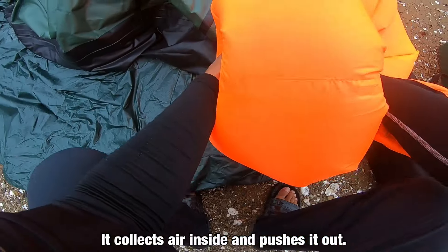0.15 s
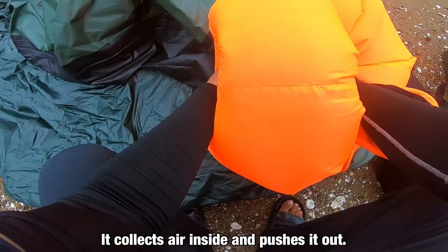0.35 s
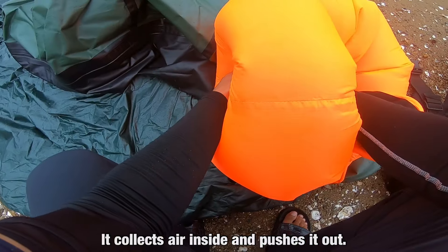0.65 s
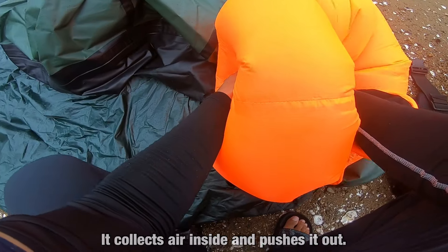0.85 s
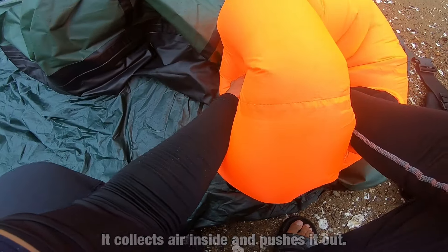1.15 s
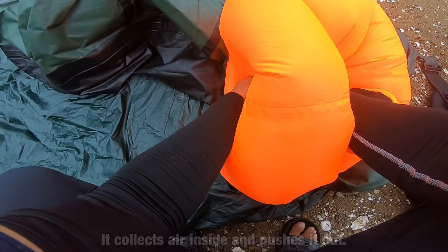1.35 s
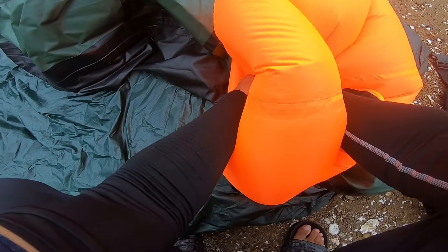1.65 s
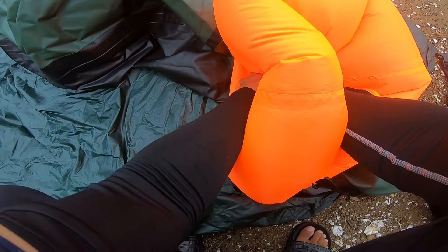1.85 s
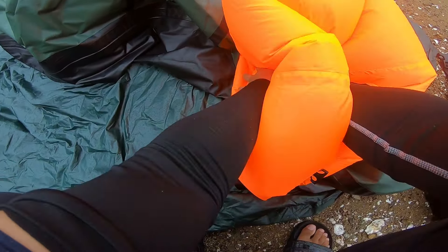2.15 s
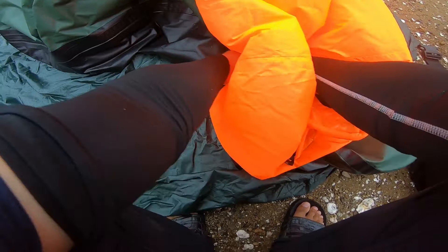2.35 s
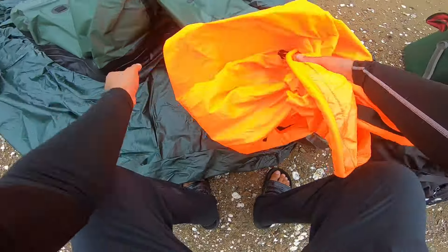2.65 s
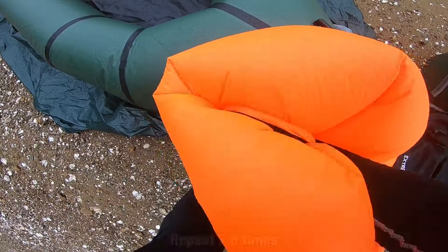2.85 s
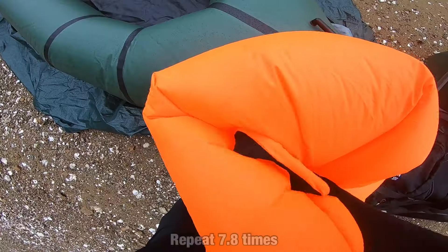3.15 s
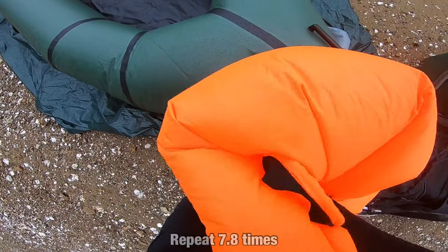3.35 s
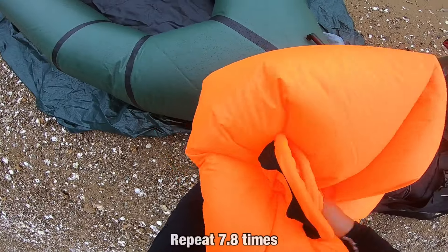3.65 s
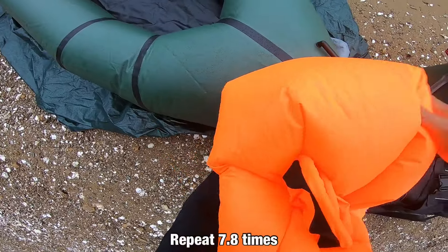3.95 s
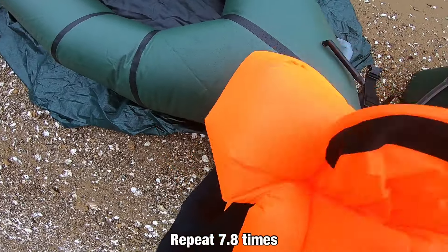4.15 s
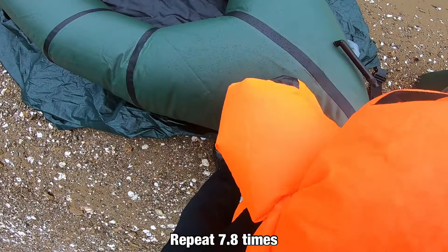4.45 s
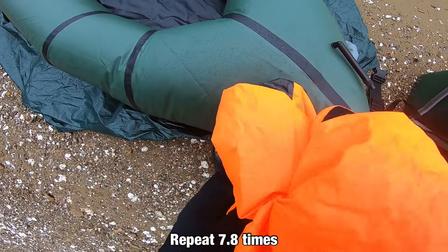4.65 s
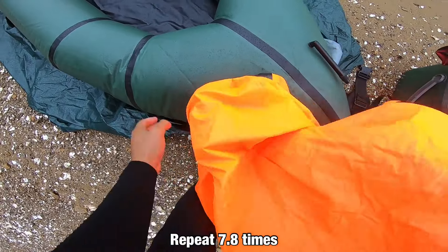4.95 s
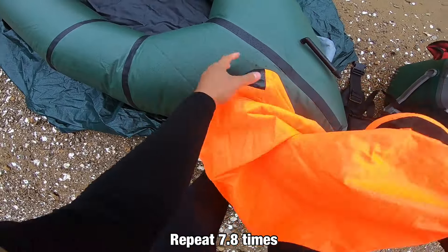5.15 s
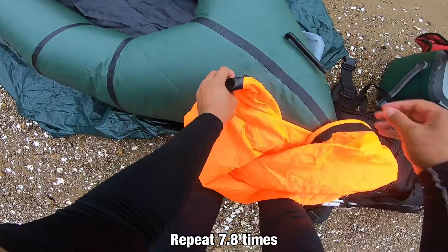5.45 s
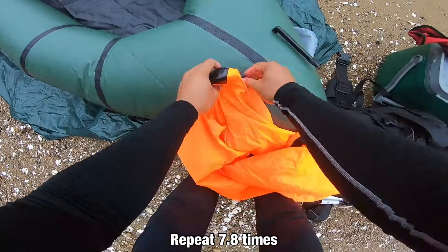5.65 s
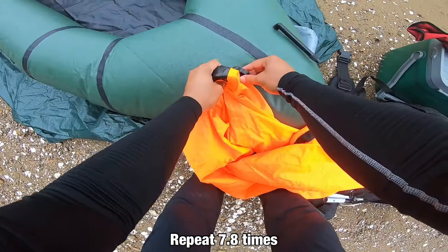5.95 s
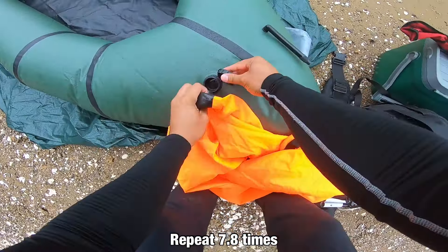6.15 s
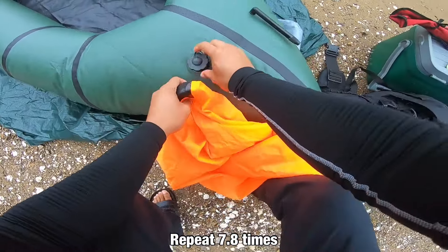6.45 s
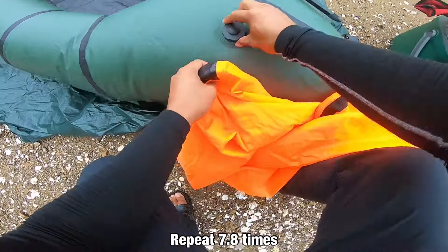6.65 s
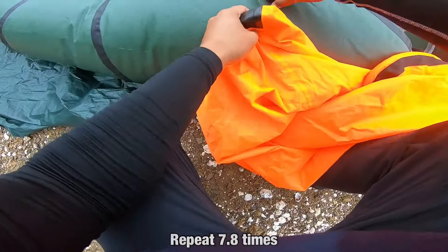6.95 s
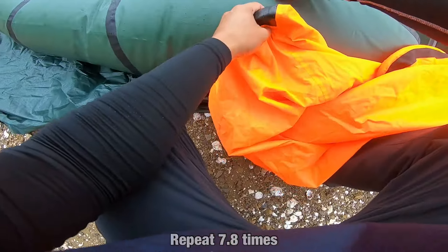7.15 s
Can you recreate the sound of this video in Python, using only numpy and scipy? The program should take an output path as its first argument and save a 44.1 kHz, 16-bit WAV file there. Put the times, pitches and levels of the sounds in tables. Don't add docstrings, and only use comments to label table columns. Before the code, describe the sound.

Thin fabric, puffed up with air, is pressed by hand right beside a small stereo camera outdoors. Dry rustle, irregular low pops with dropping pitch and dull taps against an inflated boat come thickly, then the scene cuts abruptly to separate shakes and folds and a short rubbery creak. The fabric slackens and quietens to light crinkles and small plastic ticks; low wind gusts thud and roar over it. A barely audible thin whistle of air ends it.

```python
import sys
import numpy as np
from scipy import signal
from scipy.fft import rfft, irfft, next_fast_len
from scipy.io import wavfile
from scipy.ndimage import uniform_filter1d, minimum_filter1d

SR = 44100
rng = np.random.default_rng(int(sys.argv[2]) if len(sys.argv) > 2 else 0)


def materialize(psi):
    bounded = np.clip(np.atleast_2d(psi).T, -1, 1)
    quanta = np.round(bounded * 32767).astype(np.int16)
    wavfile.write(sys.argv[1], SR, quanta)


def gain_from_decibels(decibels):
    exponent = np.asarray(decibels, float) / 20
    return 10 ** exponent


N = 322371
T = np.arange(N) / SR
SIZE = next_fast_len(N, True)
HZ = np.fft.rfftfreq(SIZE, 1 / SR)
SCENE_CHANGE_S = 2.8102


def evened(x):
    return x / np.sqrt(np.mean(x ** 2) + 1e-20)


def read(points, hz=HZ):
    f, value = np.transpose(points)
    return np.interp(np.log(hz + 1), np.log(f + 1), value)


def columns(table):
    s, *cols = np.transpose(table)
    return [np.interp(T, s, c) for c in cols]


def colour(x, points):
    return irfft(rfft(x, SIZE) * gain_from_decibels(read(points)), SIZE)[..., :N]


def add(mix, s, sound):
    part = mix[..., round(s * SR):][..., :sound.shape[-1]]
    part += sound[..., :part.shape[-1]]


def follow(x, shape):
    return signal.oaconvolve(x, shape)[:N]


def clicks(per_s, spread_db):
    size = gain_from_decibels(spread_db * np.minimum(rng.exponential(1, N), 4.5))
    return size * (rng.random(N) < per_s / SR)


def lumps(hz):
    spectrum = rfft(rng.standard_normal(N), SIZE) / np.sqrt(1 + (HZ / hz) ** 4)
    return evened(irfft(spectrum, SIZE)[:N])


def burst(t60, rise):
    t = np.arange(round(0.14 * SR)) / SR
    return gain_from_decibels(-60 * np.maximum(t - rise, 0) / t60) * np.minimum(t / rise, 1) ** 2


def swells(rows, rise, fall):
    power = []
    for s, hold, db, _ in rows:
        level = db - rise * np.maximum(s - T, 0) - fall * np.maximum(T - s - hold, 0)
        same_scene = (T < SCENE_CHANGE_S) == (s < SCENE_CHANGE_S)
        power.append(gain_from_decibels(level) ** 2 * same_scene)
    return np.array([sum(power), sum(p * row[-1] for p, row in zip(power, rows))])


def blend(parts, rest_db, rest):
    floor = gain_from_decibels(rest_db) ** 2
    return 10 * np.log10(parts[0] + floor), (parts[1] + rest * floor) / (parts[0] + floor)


# time_s, effort_db, sizzle_over_rustle_db (hands sliding)
PRESS = [(0, -38, -16.5), (.45, -34.5, -14.5), (.9, -35, -14.5), (1.42, -35.5, -12), (1.95, -37.5, -10.5),
         (2.2, -41, -8), (2.3, -37.5, -5), (2.42, -34, -7.5), (2.56, -37.5, -5), (2.81, -42, -1)]
# start_s, hold_s, effort_db, sizzle_over_rustle_db
SHAKES = [(2.855, 0.023, -50.5, -1.5), (2.94, 0.096, -44, -8), (3.01, 0.017, -41.5, -13),
          (3.09, 0.048, -32, -7), (3.16, 0.11, -36, -8.5), (3.29, 0.057, -40, -12),
          (3.35, 0.12, -37.5, -10.5), (3.48, 0.16, -37, -8.5), (3.63, 0.14, -37.5, -3),
          (3.82, 0.088, -46.5, -3.5), (3.97, 0.24, -36.5, -5.5), (4.06, 0.06, -38.5, -1),
          (4.29, 0.069, -35, -7), (4.7, 0.17, -56.5, -3), (4.92, 0.085, -50, -4), (5.16, 0.059, -53, 0),
          (5.83, .13, -50, -2.5), (6.0, 0.12, -51, -1.5), (6.16, 0.08, -49.5, -3), (6.27, 0.065, -57.5, -5),
          (6.62, 0.025, -57.5, -16), (6.69, 0.035, -53.5, -15), (6.82, 0.031, -57, -10),
          (7.125, 0.082, -53.5, -8.5), (7.275, 0.014, -51, -8)]
# start_s, hold_s, effort_db, sizzle_over_rustle_db
DRAGS = [(4.26, 1.49, -52, -2.5), (6.3, 0.17, -57, -4), (6.5, .9, -58.5, -4), (4.75, 0.09, -45, -9.5),
         (5.18, 0.016, -56.5, 7), (5.37, 0.032, -43.5, -4.5), (5.66, 0.013, -49.5, 0)]


def hands():
    shakes = swells(SHAKES, rise=265, fall=450)
    drags = swells(DRAGS, rise=50, fall=108)
    later = blend(shakes + drags, rest_db=-65, rest=-54)
    return np.where(T < SCENE_CHANGE_S, columns(PRESS), later)


# time_s, fullness_0_to_1, drumming_over_rustle_db
FULLNESS = [(0, 0.93, 7.5), (.45, 0.94, 8.5), (1.0, 0.94, 4), (2.2, 0.94, 2), (2.52, 0.88, -0.5),
            (2.57, 0.8, -4), (2.81, 0.87, -11), (2.84, 0.8, 7), (3.15, 0.92, 0), (4.06, 0.9, 7),
            (4.38, 1, 0.5), (4.42, 1, -1), (5.4, 0.58, 1.5), (5.85, 0.6, -13), (6.2, 0, 8.5), (6.6, 0, -4),
            (6.8, 0.03, -8.5), (6.92, 0.03, 3), (7.1, 0.3, 4)]


def tightness():
    taut, boom_db = columns(FULLNESS)
    return np.clip(taut, 0, 1), boom_db


def pop(hz, t60, echo_s, echo):
    t = np.arange(round(.09 * SR)) / SR
    turns = np.cumsum(hz * (1 + 2.79 * np.exp(-t / 0.002294))) / SR
    once = -np.sin(2 * np.pi * turns) * gain_from_decibels(-60 * t / t60) * np.minimum(t / 0.0013, 1) ** 2
    return once + echo * np.interp(t - echo_s, t, once, left=0)


# pitch_hz, level_db
FULL_SKIN = [(18, -42), (30, -6.5), (86, -0.5), (206, 4), (377, -4.5), (732, -12), (1100, -18.5),
             (1430, -23), (2420, -120)]
# pitch_hz, level_db
SLACK_SKIN = [(40, -29), (110, -13), (190, 3), (300, -11.5), (600, -11.5), (1000, -24.5), (2400, -120)]


def drumming(small, noise, taut):
    patter = np.zeros(N)
    for hits, hz in zip(small, np.geomspace(180, 760, 8)):
        shape = pop(hz, 0.018, rng.uniform(0.00295, 0.0087), 0.3) * rng.choice([-1, 1])
        patter += follow(hits, shape)
    patter = evened(colour(patter, [(40, -12.0), (150, 7.0), (400, 4.5), (850, -4.5), (1100, -18.5),
                                    (2000, -18.5), (6000, -70)]))
    full = 0.54 * taut * evened(colour(noise, FULL_SKIN))
    slack = 1.32 * (1 - taut) * evened(colour(noise, SLACK_SKIN))
    return taut * patter + (full + slack) * gain_from_decibels(2.0 * lumps(43))


def thud():
    t = np.arange(round(.09 * SR)) / SR
    return np.sin(2 * np.pi * 62 * t) * gain_from_decibels(-60 * t / 0.2) * np.minimum(t / 0.0035, 1)


# time_s, peak_db,
# final_pitch_hz
POPS = [(0.124, -48, 336), (0.246, -4.5, 242), (0.267, -14, 145), (0.301, -8.5, 171), (0.583, -11.5, 455),
        (0.73, -8.5, 278), (0.803, -10.5, 340), (0.839, -13.5, 177), (0.912, -18, 230), (0.962, -5.5, 199),
        (1.04, -19, 203), (1.085, -16, 340), (1.119, -28, 350), (1.163, -23, 346), (1.308, -10, 358),
        (1.352, -42, 435), (1.392, -5, 199), (1.517, -15, 168), (1.613, -30, 327), (1.706, -9, 405),
        (1.869, -12, 200), (1.952, -5.5, 212), (2.088, -19.5, 284), (2.299, -15.5, 196), (2.336, -18, 350),
        (2.52, -28, 462),
        (3.015, -9.5, 231), (3.025, -9, 173), (3.379, -10, 215), (3.448, -12.5, 554), (3.499, -7, 201),
         (3.656, -15, 290), (3.859, -16.5, 397), (3.971, -13.5, 135), (4.074, -2, 119), (4.1092, 0, 165),
         (4.115, 1, 169), (4.259, -19, 280), (4.307, -31, 300), (4.347, -12, 218), (4.363, -2, 124.6),
         (4.371, -13, 115), (5.006, -28, 403), (5.283, -25, 560), (5.651, -17.5, 130.7), (6.04, -14, 125),
         (6.044, -25, 222), (6.178, -31, 126), (6.31, -16, 120), (6.508, -28, 379), (6.968, -12.5, 337),
         (6.975, -20, 214), (7.013, -22, 218), (7.019, -11.5, 262), (7.277, -7, 292), (7.29, -14, 322),
        (.002, -11, 295), (0.211, -29, 258), (.344, -17, 366), (.355, -7.5, 294), (.377, -20, 303),
         (0.415, -29, 274), (0.463, -14, 334), (0.715, -10.5, 287), (.815, -22, 432), (1.247, -33, 183),
         (1.426, -13.5, 244), (1.467, -16, 314), (1.805, -27, 416), (1.839, -22, 250), (1.99, -25, 384),
         (2.022, -25, 309), (2.263, -19, 174), (2.479, -20, 353), (3.142, -17, 294), (3.272, -31, 295),
         (3.509, -15, 153), (3.749, -22, 195), (3.779, -22, 248), (0.539, -11, 396), (.66, -12, 340),
         (1.288, -20, 404), (4.02, -17, 250), (4.138, -12, 258), (4.164, -24, 300), (3.99, -19, 380),
         (4.058, -13, 366), (2.852, -30, 406)]
TICK_DB, TICK_SHARE = 8.5, 0.58


def buckles(rustle_db, taut, noise, ticks, cracks):
    large, flap = np.zeros(N), np.zeros(N)
    events = POPS
    for (s, db, hz), (u, v) in zip(events, rng.random(size=(len(events), 2))):
        i = round(s * SR)
        tick_db = db + rustle_db[i] + TICK_DB - (1 - TICK_SHARE) * db
        add(large, s + 0.00185, gain_from_decibels(db) * pop(hz, 0.071, 0.00316 + 0.003 * u, 0.43 * v - .3))
        add(large, s + 0.0027, gain_from_decibels(db - 25.0) * (200 / hz) ** 2 * taut[i] * thud())
        add(flap, s, gain_from_decibels(db - 4.5) * burst(0.049, 0.0046))
        add(ticks, s - .001, gain_from_decibels(tick_db) * burst(0.027, 0.0035) * np.array([[1.1], [.12]]))
        add(cracks, s + 0.0022, gain_from_decibels(tick_db + 1) * np.ones(1))
    full = evened(colour(noise, FULL_SKIN))
    slack = 1.1 * evened(colour(noise, SLACK_SKIN))
    large += flap * np.where(taut > .5, full, slack)
    return colour(large, [(35, -20), (70, -5), (130, -6.5), (700, -7.5), (1100, -10.5), (1800, -10),
                          (4000, -32), (9000, -72)])


# time_s, peak_db
CREASES = [(0.214, -27), (0.2472, -12), (0.5047, -22), (0.805, -17), (0.8375, -14), (0.895, -11),
           (0.9118, -12), (0.9521, -28), (0.9642, -8), (1.044, -12.5), (1.086, -22), (1.1208, -23),
           (1.163, -14), (1.3084, -14), (1.3542, -15), (1.395, -8.5), (1.5228, -11.5), (1.71, -13),
           (1.8393, -11), (1.8698, -17), (1.937, -26), (1.954, -17.5), (2.3, -19), (2.3275, -30),
           (2.5893, -12), (2.9295, -37), (3.0185, -11), (3.452, -32), (3.502, -25), (3.57, -31),
           (3.7366, -20), (3.839, -38), (3.8489, -32), (3.86, -32), (3.949, -14), (4.0763, -13.5),
           (4.0874, -11), (4.163, -19), (4.2646, -24), (4.2762, -21), (4.313, -30), (4.3187, -20.5),
           (4.363, -11), (5.2959, -17), (5.8364, -32), (6.332, -28), (6.3502, -28), (6.4028, -26.5),
           (6.448, -28), (6.686, -36), (6.739, -33), (6.9526, -45), (7.122, -27), (7.155, -30),
           (7.2765, -31)]


def creases(cracks):
    for s, db in CREASES:
        add(cracks, s + 0.00101, gain_from_decibels(db - 3) * np.ones(1))


# time_s, peak_db, pitch_hz
KNOCKS = [(0.448, -21, 740), (0.508, -15, 627), (0.564, -25, 501), (0.838, -18, 503), (0.912, -18, 571),
          (1.042, -15.5, 540), (1.121, -12, 510), (1.309, -8, 450), (1.354, -18, 611), (1.522, -10, 654),
          (1.615, -17, 552), (2.031, -23, 557), (2.089, -16.5, 456), (2.3, -18.5, 680), (2.337, -24, 732),
          (2.366, -23, 568), (2.446, -26, 452), (2.5, -25, 452), (2.519, -15, 553), (2.705, -21, 770),
          (3.017, -17, 473), (3.142, -17, 554), (3.433, -21, 452), (3.452, -11, 550), (3.502, -13, 649),
          (3.609, -23, 476), (3.658, -7, 570), (4.075, -10, 638), (4.109, -14, 458), (4.163, -18, 624),
          (4.276, -23, 455), (4.312, -16.5, 781), (4.351, -16, 770), (4.371, -8, 700), (4.841, -35, 490),
          (5.01, -41, 452)]


def knocks():
    out = np.zeros(N)
    t = np.arange(round(.02 * SR)) / SR
    for s, db, hz in KNOCKS:
        turns = hz * t * (1.15 - 0.084 * np.minimum(hz * t, 4))
        fade = gain_from_decibels(-20 * hz * t / 2.8)
        add(out, s, gain_from_decibels(db - 1) * -np.sin(2 * np.pi * turns) * fade * np.minimum(t / 0.00013, 1))
    return out


# time_s, peak_db
SNAPS = [(1.163, -20), (1.122, -24), (2.0328, -19.5), (2.09, -21), (2.3687, -25), (2.852, -26), (2.86, -28),
         (2.904, -26), (3.007, -31), (3.0268, -26), (1.356, -24), (3.347, -24.5), (3.644, -16),
         (1.3092, -21), (3.95, -38), (3.9773, -33), (4.0672, -15), (4.0873, -26), (4.108, -30),
         (4.2046, -33), (4.277, -28), (4.341, -16), (4.374, -15), (5.3414, -28), (5.4903, -29.5),
         (7.005, -40), (6.511, -37.5), (6.82, -32.5), (6.832, -39), (6.851, -38), (6.904, -39.5)]
# time_s, peak_db
CAP = [(5.296, -38), (5.8182, -45), (5.851, -41), (5.8721, -33.5), (5.8924, -38), (5.905, -41),
       (5.915, -39), (5.9227, -33.5), (5.934, -37), (5.947, -44), (5.952, -34), (5.9756, -36.5),
       (6.011, -43), (6.0407, -33.5), (6.0736, -44), (6.098, -48), (6.155, -45), (6.1735, -44),
       (6.4395, -44.5)]


def snaps(ticks):
    for table, sizzle_db in [(SNAPS, -34), (CAP, -4)]:
        for s, db in table:
            add(ticks, s + 0.00025, gain_from_decibels([[db + 0.5], [db + sizzle_db + 7.5]]) * burst(.0055, .0007))


# pitch_hz, level_db
FULL_RUSTLE = [(530, 4.5), (900, 1.5), (1090, 5.5), (1410, 0.5), (2630, -5), (5500, -20.5), (6000, -16),
               (7800, -28.5), (13200, -120)]
# pitch_hz, level_db
LIMP_RUSTLE = [(530, -30), (900, -7), (1180, -5), (2550, 0.5), (3420, 1), (4690, -9), (6000, -14),
               (7800, -24.5), (13200, -120)]
# pitch_hz, level_db
SIZZLE = [(3240, -4.5), (5500, -2), (6840, -6.5), (8760, -8), (11500, -12.5), (13500, -18.5), (15600, -37)]


def rubbing(small, noise, levels_db, ticks, taut):
    shared = follow(3.9 * sum(small) + clicks(400, 6.9), burst(0.0087, 0.001))
    gates = []
    for db, tick in zip(levels_db, ticks):
        own = follow(clicks(300, 28.0), burst(0.019, 0.00066))
        sway = gain_from_decibels(.9 * lumps(22))
        gate = 2.2 * sway + .5 * evened(shared) + 0.21 * evened(own)
        gates.append(gain_from_decibels(db - 1.5) * evened(gate) + tick)

    def hiss(gate, threads, points):
        return colour(threads * gate, points) / np.sqrt(np.mean(gain_from_decibels(read(points)) ** 2))

    full = hiss(gates[0], noise[:2], FULL_RUSTLE)
    limp = hiss(gates[0], noise[:2], LIMP_RUSTLE)
    return np.sqrt(taut) * full + np.sqrt(1 - taut) * limp + hiss(gates[1], noise[2:], SIZZLE)


# pitch_hz, level_db
CRACK = [(300, -9), (700, -0.5), (1500, 0), (2500, -4.5), (4500, -11.5), (8000, -31), (14000, -34)]


def cracking(cracks):
    height = colour(np.arange(N) == 0, CRACK).max()
    return colour(cracks, CRACK) / height


# time_s, strength_0_to_2
POCKET_STRENGTH = [(0, 1.2), (.3, 0.9), (.9, 1.64), (1.4, 0.78), (2, 0.98), (2.8, 1.4), (2.82, 0.17),
                   (5.3, 0.13), (5.7, 0.85), (6.2, 0.45), (6.7, 0.57), (7.3, 0.33)]
# grip_hz, bulge_hz, flat_hz, empty_hz, half_width_hz, level_db
POCKETS = [(1060, 1050, 1190, 990, 140, -4), (1290, 1680, 2180, 1800, 160, 3),
           (1960, 2430, 3300, 1300, 310, -0.5), (2750, 2660, 2860, 3180, 100, 2.5),
           (3480, 4030, 3200, 3380, 125, 2), (4550, 4700, 5000, 4450, 160, -2.5),
           (5130, 5620, 5360, 5700, 230, 3)]
POCKET_TIMES_S = [0, 0.63, 2.35, 3.7]


def patchy(x):
    hz, _, z = signal.stft(x, SR, nperseg=512, noverlap=384)
    field = uniform_filter1d(rng.standard_normal(z.shape[1:]), size=4, axis=0)
    field = uniform_filter1d(field, size=70, axis=1)
    frames = np.minimum(np.arange(z.shape[-1]) * 128, N - 1)
    strength = columns(POCKET_STRENGTH)[0][frames]
    pockets_db = 0
    for *pitches, width, db in POCKETS:
        centre = np.interp(T[frames], POCKET_TIMES_S, pitches)
        pockets_db = pockets_db + db * np.exp(-.5 * ((hz[:, None] - centre) / width) ** 2)
    z = z * gain_from_decibels(1.5 * evened(field) + strength * pockets_db)
    return signal.istft(z, nperseg=512, noverlap=384)[1][:, :N]


# time_s, left_over_right_db
PAN = [(0.0, 0), (1.51, -3), (2.67, -1), (3.89, -9.5), (4.11, -7), (4.38, -13), (4.54, -10.5), (4.58, -7),
       (5.03, -4), (5.23, -8), (5.8, 1), (7.31, 0)]
# pitch_hz, likeness_0_to_1
SAME = [(150, 1), (450, 1), (700, 1), (1100, 0.057), (1700, 0.89), (2600, 0.64), (4000, 0.91), (5980, 0.14),
        (9000, .05)]
# pitch_hz, share
LEAN = [(100, 0.22), (450, 0.12), (750, 0.77), (1500, 0.82), (2400, 0.51), (4500, 0.19), (9000, 0.32),
        (15000, 0.87)]
# pitch_hz, lead_radians
LEAD = [(300, 0), (900, 0.84), (2400, 0.54), (4200, -0.2), (5000, -.5), (6720, -2.5), (11100, -5.5),
        (14100, 0)]


def ports(a, b):
    same = np.clip(read(SAME), 0, 1)
    alike = same * rfft(a, SIZE) * np.exp(-1j * read(LEAD))
    unlike = np.sqrt(1 - same ** 2) * rfft(b, SIZE)
    pair = np.array([a, irfft(alike + unlike, SIZE)[:N]])
    shaded = irfft(rfft(pair, SIZE) * np.clip(read(LEAN), 0, 2) / 2, SIZE)[:, :N]
    pan_db = columns(PAN)[0]
    return pair + shaded * (gain_from_decibels(np.array([pan_db, -pan_db])) - 1)


def fabric():
    rustle_db, slide_db = hands()
    taut, boom_db = tightness()
    small = [clicks(55, 2.0) for _ in range(8)]
    noise = rng.standard_normal((6, N))
    ticks = np.zeros((2, N))
    cracks = gain_from_decibels(rustle_db + 6.5) * (.9 * sum(small) + clicks(260, 2.2)) * rng.choice([-1, 1], N)
    out = gain_from_decibels(rustle_db + boom_db) * drumming(small, noise[:2], taut)
    out += buckles(rustle_db, taut, noise[0], ticks, cracks)
    creases(cracks)
    out += knocks()
    snaps(ticks)
    rustle = rubbing(small, noise[2:], [rustle_db, rustle_db + slide_db], ticks, taut)
    out += patchy(rustle + cracking(cracks))
    return ports(out[0], out[1])


# start_s, hold_s, buffet_db, left_over_right_db
GUSTS = [(2.3, 0.4, -47.5, 3), (2.664, 0.22, -23.5, 13), (3.02, 0.39, -41, 2), (3.46, 0.091, -31, 0),
         (3.58, 0.047, -30.5, 0), (3.75, 0.036, -25, -4), (3.96, 0.16, -24.5, -0.5),
         (4.35, 0.0067, -27.5, 0), (4.55, 0.79, -62.5, -1), (5.324, 0.053, -35, -8),
         (5.45, 0.1, -34.5, 2.5), (5.63, 0.042, -38, 1), (5.705, 0.015, -28.5, 11),
         (5.78, 0.083, -39.5, -2), (5.98, 0.081, -27, -2.5), (6.09, .03, -37, 3), (6.16, 0.14, -23, 24),
         (6.36, 0.13, -36, 19), (6.5, .02, -47, 15), (7.0, 0.18, -56, 0)]
# start_s, hold_s, roar_db, rasp_over_roar_db
ROARS = [(2.68, 0.33, -30.5, -11), (3.52, 0.085, -28.5, -20), (4.1, .04, -22, -6),
         (5.33, 0.049, -29.5, -13), (5.42, 0.16, -47.5, 0), (5.65, 0.031, -35.5, 0), (5.7, 0.068, -45, -1),
         (6.05, 0.0038, -26.5, -22), (5.955, 0.0093, -38, -8), (6.155, 0.051, -23, -29),
         (6.215, 0.051, -11.5, -19), (6.29, 0.051, -20.5, -7), (6.355, 0.0085, -22, 5),
         (6.38, 0.1, -26, -15), (6.51, 0.022, -31, -12)]
# pitch_hz, level_db
BUFFET = [(12, -42), (25, 5.5), (65, 5), (120, -3), (250, -23.5), (500, -37), (2000, -120)]
# pitch_hz, level_db
ROAR = [(50, -10), (100, 6.5), (140, 1), (280, -6), (450, -14), (900, -61), (3000, -120)]
# pitch_hz, level_db
RASP = [(200, -12), (400, -11.5), (800, -7), (1300, -20.5), (2200, -50), (6000, -120)]


def wind():
    db, pan_db = blend(swells(GUSTS, rise=420, fall=126), rest_db=-73, rest=0)
    roar_db, rasp_db = blend(swells(ROARS, rise=600, fall=370), rest_db=-73, rest=0)
    left, right, both = evened(colour(rng.standard_normal((3, N)), BUFFET))
    buffet = 0.47 * np.array([left, right]) * gain_from_decibels([2.0 * lumps(11.0), 2.0 * lumps(1.5)]) + 0.43 * both
    flutter = evened(follow(clicks(130, 3.5), burst(0.018, 0.0026)))
    eddies = rng.standard_normal(N) + .5 * rng.standard_normal((2, N))
    roar = evened(colour(eddies * (1.3 + flutter), ROAR))
    rasp = evened(colour(eddies * (0.38 + flutter), RASP))
    share = gain_from_decibels(np.array([pan_db, -pan_db]))
    share = np.sqrt(2 * share / (share[0] + share[1]))
    since = T - SCENE_CHANGE_S
    swing = .09 * np.cos(2 * np.pi * 80 * since) * np.exp(np.minimum(since, 0) / .012) * (since < 0)
    turbulence = gain_from_decibels(roar_db - 2.5) * (roar + gain_from_decibels(rasp_db - 7.5) * rasp * share ** -.15)
    return share * (gain_from_decibels(db + 8.5) * buffet + turbulence + swing)


# time_s, slips_per_s, level_db
CREAK = [
    (3.195, 275, -28),
    (3.21, 236, -27),
    (3.235, 203, -27),
    (3.265, 222, -27.5),
    (3.295, 146, -30),
]


def creak():
    hz, db = columns(CREAK)
    turn = 2 * np.pi * np.cumsum(hz * (1 + 0.02 * lumps(62))) / SR
    slips = np.sin(turn) + np.sin(turn / 2)
    slips += 0.15 * np.sin(2 * turn) + 0.075 * np.sin(3 * turn) + .12 * np.sin(4 * turn)
    return gain_from_decibels(db) * slips * (T > CREAK[0][0]) * (T < CREAK[-1][0])


# time_s, pitch_hz, level_db
LEAK = [
    (7.2, 11500, -78),
    (7.213, 11600, -68),
    (7.238, 11300, -74),
    (7.31, 11300, -77.5),
]


def leak():
    hz, db = columns(LEAK)
    lower = np.sin(2 * np.pi * np.cumsum(hz) / SR)
    upper = np.sin(2 * np.pi * np.cumsum(24000 - hz) / SR)
    return (T > LEAK[0][0]) * gain_from_decibels(db - 4) * (lower + 0.484 * upper)


def scene():
    return fabric() + wind() + creak() + leak()


def low_pass(x):
    return signal.sosfilt(signal.butter(12, 15710, fs=SR, output="sos"), x)


# time_s, stereo_width_db
WIDTH = [(5.3, -0.5), (5.5, -0.5), (6.05, -2), (6.15, 2.5), (6.36, 6), (6.55, -5.5), (6.7, -15),
         (7.31, -39)]
# pitch_hz, level_db
HOUSING = [(650, -1), (900, -3), (1020, -4), (1230, -2), (1400, -0.8), (5000, 0.4), (12000, 1.6),
           (15000, -4.5)]


def record(dry):
    mid, side = dry.mean(0), (dry[0] - dry[1]) / 2 * gain_from_decibels(columns(WIDTH)[0])
    heard = colour(np.array([mid + side, mid - side]), HOUSING)
    room = np.minimum(.86 / (abs(heard).max(0) + 1e-9), 1)
    heard = heard * uniform_filter1d(minimum_filter1d(room, size=401), size=201)
    edge = signal.firwin(511, 15700, window=("kaiser", 9), fs=SR)
    return low_pass(signal.oaconvolve(heard, edge[None], "same"))


dry = scene()
out = record(dry)
materialize(out)
```